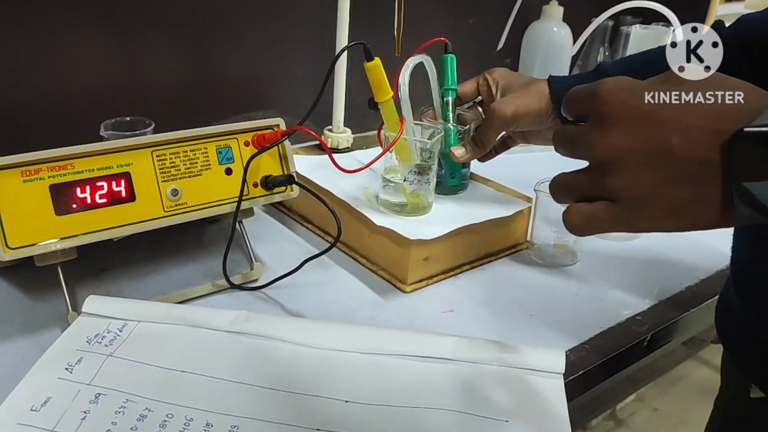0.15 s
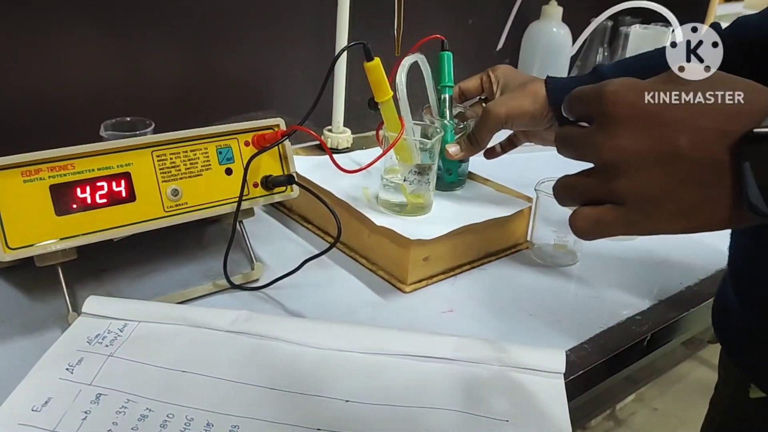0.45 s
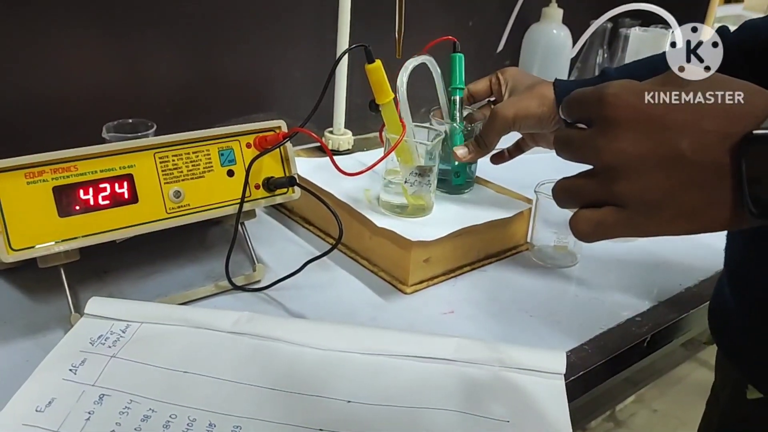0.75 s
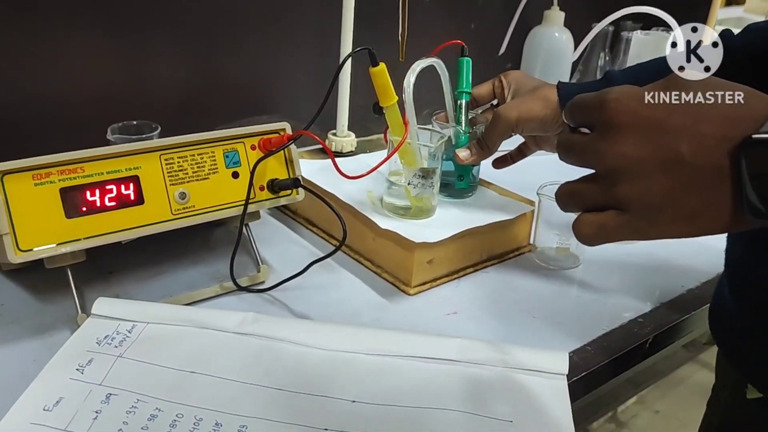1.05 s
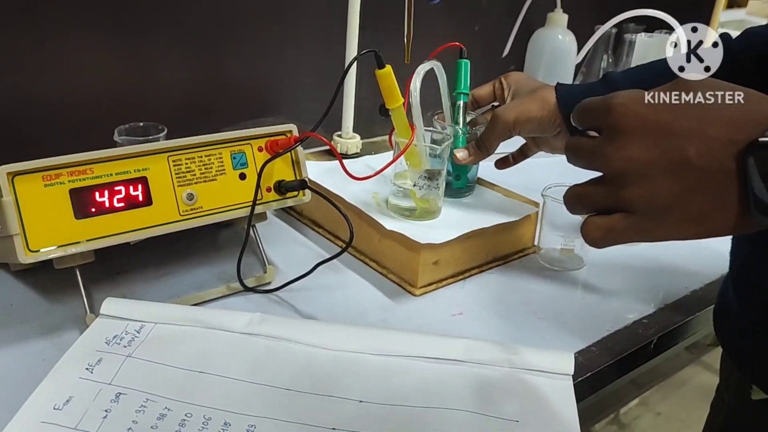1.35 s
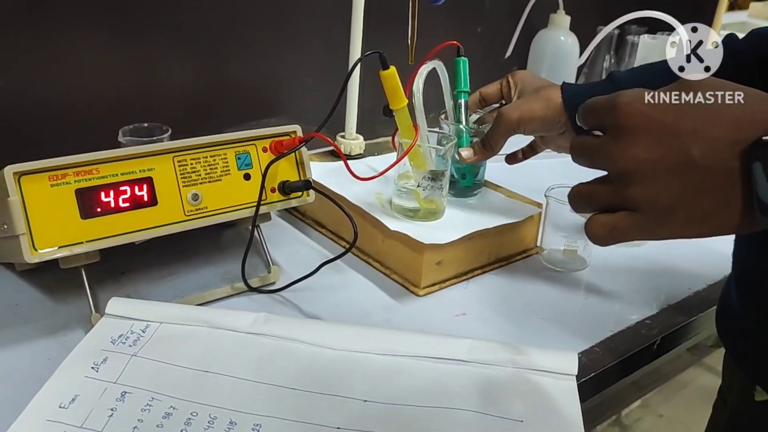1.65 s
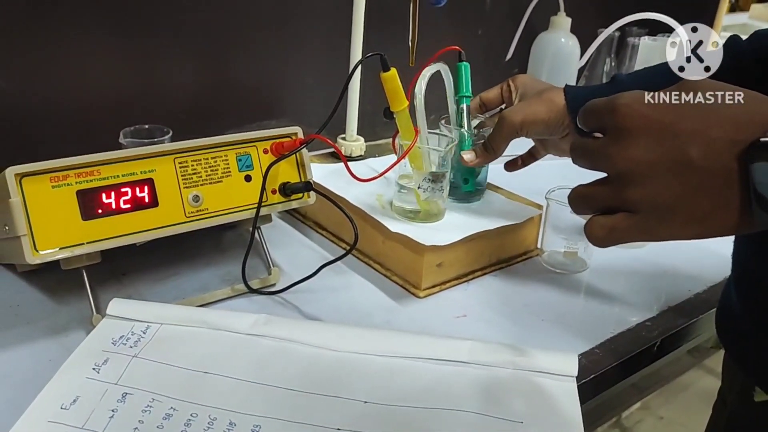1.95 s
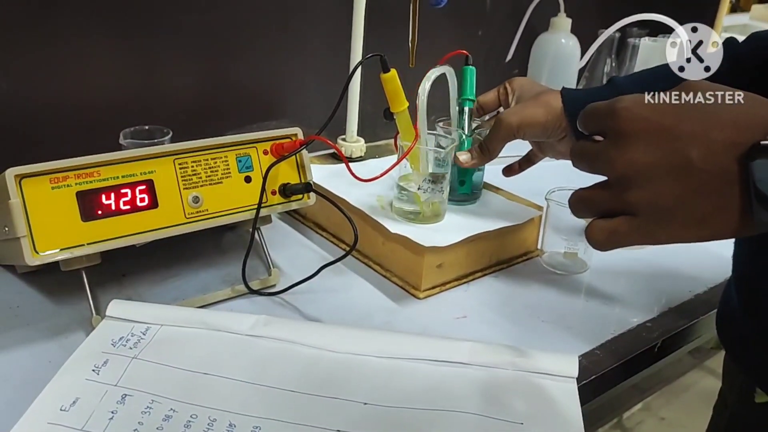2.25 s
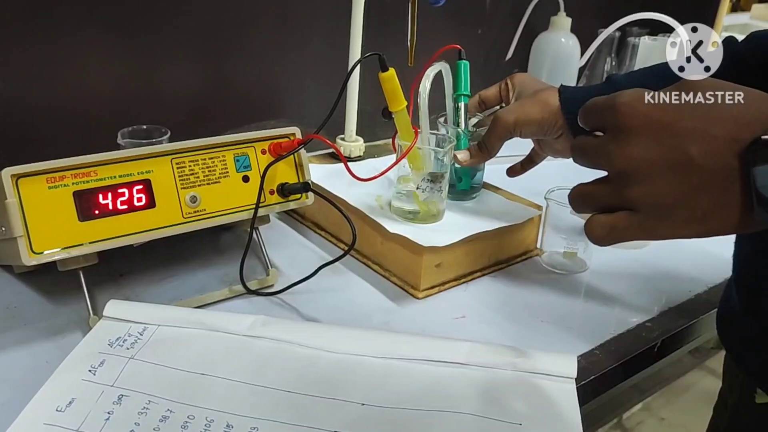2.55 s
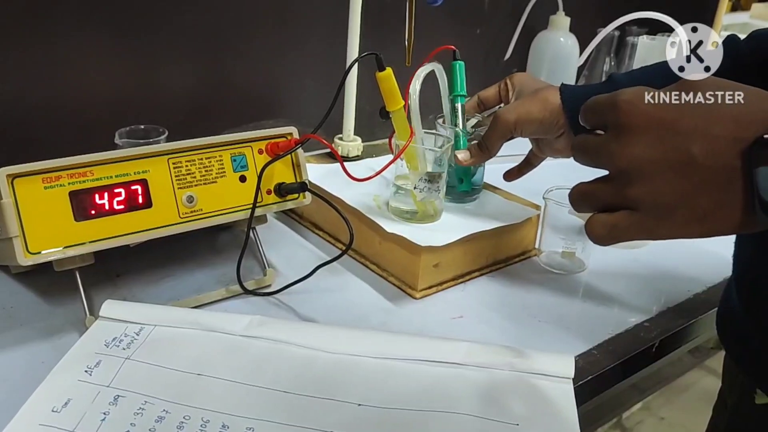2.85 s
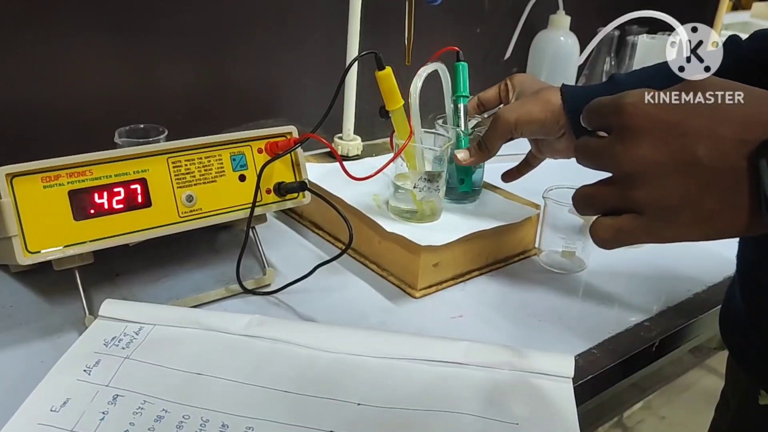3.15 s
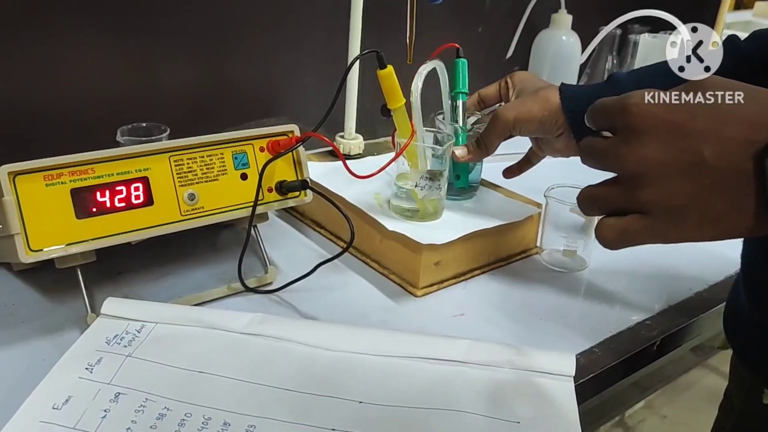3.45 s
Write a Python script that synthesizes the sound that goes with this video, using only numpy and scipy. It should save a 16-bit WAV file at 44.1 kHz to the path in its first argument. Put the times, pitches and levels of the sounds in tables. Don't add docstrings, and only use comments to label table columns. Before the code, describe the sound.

Light, quick glass clinking as a hand swirls a beaker on a wooden stand in a lab

```python
import sys
import numpy as np
from scipy import signal
from scipy.fft import rfft, irfft
from scipy.io import wavfile
from scipy.ndimage import uniform_filter1d

SR = 44100
rng = np.random.default_rng(int(sys.argv[2]) if len(sys.argv) > 2 else 0)


def unload_audio(sound):
    columns = np.transpose(np.atleast_2d(sound))
    steps = np.round(np.clip(columns, -1, 1) * 32767)
    wavfile.write(sys.argv[1], SR, steps.astype(np.int16))


def gain_from_db(level_db):
    decades = np.asarray(level_db, float) / 20
    return 10 ** decades


N = 158760

# (frequency [Hz], level [dB])
AIR = [(40, -4), (120, 3), (350, 2.5), (700, -10), (1700, -13), (3000, -13), (5000, -16), (16000, -18)]
# (frequency [Hz], time to fall 60 dB [s])
ROOM_T60 = [(200, 0.84), (1500, 1), (5000, 0.47), (10000, 0.67), (15000, 0.28)]
# (time
# [s], peak level [dB], pitch [Hz])
TOCKS = [(0.168, -39, 1790), (0.2593, -35, 1960), (0.6015, -42.5, 1990), (0.6429, -38.5, 1900),
         (0.815, -53, 1970), (1.203, -32, 1860), (1.6577, -41.5, 1840), (1.8532, -37, 1810),
         (1.8985, -36.5, 1730), (2.0753, -34, 1830), (2.116, -40, 2070), (2.3041, -34, 1770),
         (2.371, -37, 1590), (2.7444, -41, 1937), (2.81, -41.5, 1900), (2.9745, -36, 1840),
         (3.2048, -34, 1800), (3.2483, -36, 1930), (3.2999, -43, 1880), (3.4232, -37, 1980),
         (2.569, -30, 3380), (2.583, -33, 3550)]
# (time [s], peak level [dB], pitch [Hz], clack level [dB], clack pitch [Hz])
KNOCKS = [(0.002, -51.5, 288, -10, 4170), (0.1335, -42.5, 344, 18.5, 4040), (0.167, -52, 430, 16, 4600),
          (0.279, -37.5, 173, -13, 4040), (0.262, -47.5, 254.4, 2, 4000), (0.346, -44.5, 278, 9, 4230),
          (0.582, -40.5, 345, 22.5, 4190), (0.603, -47, 393, -24, 4140), (0.822, -44, 273, 21.5, 4290),
          (0.831, -43.5, 302, 11, 3870), (1.047, -42.5, 352, 14.5, 4080), (1.262, -41, 315, 19.5, 4280),
          (1.461, -42, 336, 10.5, 4500), (1.707, -39, 327, 13, 4250), (1.861, -40.5, 341, -2, 4170),
          (1.944, -35.5, 328, -22, 4260), (1.992, -45, 293, 11, 3830), (2.086, -42.5, 317, 17, 3540),
          (2.167, -38.5, 274, 14.5, 4120), (2.801, -41.5, 367, 17, 3820), (3.04, -41, 352, 16, 4100),
          (3.472, -44.5, 288, 18.5, 4300), (2.575, -46.5, 137, 3, 3280)]
# (frequency [Hz], level [dB])
STAND_MODES = [(140, -1), (200, -33), (280, 1), (440, -2.5), (1320, 0), (1950, -18.5)]
# (frequency [Hz], level [dB])
RATTLE = [(100, -31), (300, 6.5), (650, -15), (1100, -18), (1300, -6.5), (2000, -5.5), (3000, -18),
          (7000, -24)]
# (frequency [Hz], level [dB])
THUD = [(150, -18), (320, -19), (800, -0.5), (1500, -23), (3000, -16.5), (4200, 3), (8000, -7),
        (14000, -13)]
# (time [s], peak level [dB], main pitch [Hz], tube ring [dB], brightness [dB])
FAR_TICKS = [(0.0285, -26.5, 5320, -19, -0.5), (0.2419, -16, 5010, -42, 0.5), (0.259, -17, 4650, -29, 1),
             (0.268, -23.5, 4670, -29, 8), (0.281, -47, 4700, -29, -5), (0.474, -18.5, 5260, -42, -0.5),
             (0.7107, -16.5, 5310, -16, 4), (0.9276, -22, 5280, -16, -1), (1.1922, -16, 5140, -35, 4),
             (1.3994, -20.5, 5300, -30, 7), (1.6543, -15.5, 5080, -10, 6.5), (1.8854, -15, 5140, -8, 7.5),
             (2.0842, -19, 4720, 3.5, 5.5), (2.1079, -14, 5080, -28, 3.5), (2.114, -13.5, 4760, -19, -1),
             (2.3221, -23, 5500, -22, 11), (2.3303, -10.5, 4725, 0, 1), (2.5674, -20, 4970, -1.5, 6),
             (2.574, -28, 4760, 0, 12), (2.7903, -21, 5090, -23, 7), (2.8094, -22, 5280, -5, -4),
             (3.029, -16, 5045, -24, 0), (3.046, -21.5, 4920, -7.5, 1.5), (3.211, -21, 4470, -7, 4.5),
             (3.243, -20, 5210, -12, 1.5), (3.464, -22.5, 5330, -20, -0.5), (3.4747, -27.5, 5000, -7, 1)]
# (time [s], peak level [dB], main pitch [Hz], tube ring [dB], brightness [dB])
NEAR_TICKS = [(0.1421, -30, 4830, -30, 3.5), (0.1685, -31, 4950, -30, -4), (0.3446, -38, 4690, -30, 2),
              (0.587, -27, 4870, -34, -4), (0.8295, -28.5, 4900, -30, 3), (1.4611, -30.5, 5000, -6, -1.5),
              (0.3877, -15.5, 4720, -37, -7.5), (0.632, -17.5, 5010, -42, -6),
              (0.856, -16.5, 4790, -43, -4), (1.0657, -32, 5020, -32, -32), (1.1363, -27, 4960, -36, -1.5),
              (1.3781, -17, 4870, -23, -7), (1.6141, -14, 4980, -43, -7), (1.706, -22.5, 4600, 3, -6),
              (1.842, -7.5, 4860, -44, -5.5), (1.943, -29, 4860, 3.5, 10), (1.994, -25, 4780, -35, -19),
              (2.0627, -13, 4890, -32, 3), (2.165, -45, 4800, -27, -7), (2.2938, -12, 4870, -33, -3),
              (2.7324, -11, 4850, -14.5, -6), (2.9632, -12, 4794, -15, -1), (3.194, -15.5, 4830, -14, 1.5),
              (3.4109, -15.5, 4867, -5, 1.5)]
# (frequency [Hz], level [dB])
FAR_MODES = [(1537, -39), (3820, -17.5), (4650, -18.5), (7090, -20), (7960, -18), (8543, -12),
             (8846, -13.5), (9870, -23), (11040, -12), (13730, -13), (13200, -32), (15100, -37.5)]
# (frequency [Hz], level [dB])
NEAR_MODES = [(1900, -33), (4180, -39), (4680, -18.5), (7900, -21), (8700, -11), (9190, -9.5),
              (11400, -14.5), (13600, -12.5)]
# (frequency [Hz], level [dB])
CRACK = [(900, -18.5), (1500, -8.5), (2900, -16), (5000, 4), (6500, -5), (8700, -5.5), (10400, -3.5),
         (14000, -5)]
# (frequency [Hz], left minus right [dB])
PORTS = [(60, -7), (110, 5), (200, -1), (380, 0), (700, -1.5), (1290, 2.5), (2380, 1.5), (4400, -9.5),
         (8120, -2), (15000, -7)]
# (frequency [Hz], level [dB])
MIC = [(9300, 2), (10400, -6.5), (11150, -2), (12300, -7), (13800, -2), (14700, -3.5)]
# (frequency [Hz], level [dB])
BODY = [(2100, 0.5), (2700, 2), (3200, 1.5), (3800, 3), (4400, -2.5), (4900, 1.5), (5500, -4.5), (6500, 0)]
# (low edge [Hz], margin [dB])
MUTED = [(9600, -13), (10300, -13), (11700, -22), (12400, -24), (14400, -20), (15100, -22), (15800, -30)]

AIR_DB, FLICKER_DB, FLICKER_HZ = -55, 3, 9.8
ALIKE_HZ = 580
ECHO_DELAY_S, ECHO_DB, ECHO_T60_S, ECHO_RISE_S = 0.008, -7.5, 0.084, 0.00087
ROOM_DB, ROOM_RISE_S, SHIMMER_DB = -8.5, 0.012, 3
SCATTER_DB, DETUNE, MAIN_WANDER = 3, 0.017, 0.08
TURN_RAD, TURN_HZ = 0.8, 900
BOUNCE_S, BOUNCE_SPREAD = 0.0135, 0.15
KNOCK_BOUNCE_DB, FAR_BOUNCE_DB, NEAR_BOUNCE_DB = -10.5, -6, -12
SPLIT = 3
GLASS_T60_S, WOOD_T60_S = 0.021, 0.045
TOCK_DB, TOCK_T60_S = 2, 0.026
STAND_T60_S, STAND_RISE_S, CLACK_T60_S = 0.16, 0.0029, 0.023
RATTLE_DB, RATTLE_T60_S = 0.5, 0.17
THUD_DB, THUD_T60_S, TAP_DB = 6, 0.024, -6
FAR_PAN_DB, FAR_T60_S, FAR_RISE_S = -1, 0.024, 0.0013
NEAR_PAN_DB, NEAR_T60_S, NEAR_RISE_S = -3, 0.028, 0.003
TUBE_HZ, TUBE_DB, TUBE_T60_S = 5930, -9, 0.05
TWIN_DB, TWIN_RATIO = -5, 1.035
CRACK_DB, CRACK_T60_S = -5.5, 0.028
GRIP_S, GRIP_DB = 1.3, -8.5
TOP_HZ, TOP_DB = 15500, -29
MUTE_WIDTH_HZ, WAVER_DB = 700, 4


def curve(table, hz):
    p = np.array(table, float)
    return np.interp(np.log(np.maximum(hz, 1)), np.log(p[:, 0]), p[:, 1])


def colour(x, db):
    n = x.shape[-1]
    hz = np.arange(n // 2 + 1) * SR / n
    return irfft(rfft(x) * gain_from_db(db(hz)), n)


def fade(t, t60, rise=1e-4):
    return (1 - np.exp(-t / abs(rise))) * np.exp(-np.log(1000) * t / np.abs(t60))


def alike(mid, pair):
    def shared(f):
        return 1 / (1 + (f / ALIKE_HZ) ** 4) / (1 + (45 / (f + 1)) ** 4)

    same = colour(mid, lambda f: 10 * np.log10(shared(f)))
    return same + colour(pair, lambda f: 10 * np.log10(1.03 - shared(f)))


def noise(n):
    return alike(rng.standard_normal(n), rng.standard_normal((2, n)))


def air():
    x = colour(noise(N), lambda f: curve(AIR, f))
    low = colour(x, lambda f: -10 * np.log10(1 + (f / ALIKE_HZ) ** 4))
    walk = colour(rng.standard_normal((2, N)), lambda f: -10 * np.log10(1 + (f / FLICKER_HZ) ** 4))
    gain = gain_from_db(FLICKER_DB * walk / walk.std())
    return (low * gain[0] + (x - low) * gain[1]) / x.std() * gain_from_db(AIR_DB)


def room(x):
    def unit(h):
        return h / np.sqrt((h ** 2).sum(axis=-1).mean())

    t = np.arange(SR) / SR
    echo = noise(SR) * fade(np.maximum(t - ECHO_DELAY_S, 0), ECHO_T60_S, ECHO_RISE_S)
    tail, source = 0, noise(SR)
    for hz in 125 * 2. ** np.arange(8):
        def octave(f):
            distance = np.clip(np.log2((f + 1) / hz), -1, 1)
            return 20 * np.log10(np.cos(distance * np.pi / 2) ** 2 + 1e-6)

        tail = tail + colour(source, octave) * fade(t, curve(ROOM_T60, hz), ROOM_RISE_S)
    reply = gain_from_db(ECHO_DB) * unit(echo) + gain_from_db(ROOM_DB) * unit(tail)
    return signal.fftconvolve(x.mean(axis=0)[None], reply, axes=1)[:, :N]


def shimmer(x):
    _, _, z = signal.stft(x, SR, nperseg=512)
    waver = uniform_filter1d(rng.standard_normal(z.shape[1:]), size=4, axis=0)
    waver = uniform_filter1d(waver, size=4, axis=1)
    gain = gain_from_db(SHIMMER_DB * waver / waver.std() - 2)
    return signal.istft(z * gain, SR, nperseg=512)[1][:, :N]


def ring(events, modes, rise, hiss, hiss_db, hiss_t60, pan_db):
    out = np.zeros((2, N + SR))
    t = np.arange(SR // 7 if hiss_t60 > .1 else SR // 14) / SR
    for (start, db), rows, level_db in zip(events, modes, hiss_db):
        hz, mode_db, t60 = np.array(rows, float).T[:, :, None]
        detune, shift, scatter, turn = rng.standard_normal((4, len(rows), 1))
        free = np.arange(len(rows))[:, None] > 1
        pitch = hz * (1 + DETUNE * detune * np.maximum(free, MAIN_WANDER))
        phase = 2 * np.pi * pitch * t + 3 * shift
        env = gain_from_db(mode_db + SCATTER_DB * scatter * free) * fade(t, t60, rise)
        crack = colour(noise(len(t)), lambda f: curve(hiss, f))
        crack = crack / crack.std() * gain_from_db(level_db) * fade(t, hiss_t60, rise / 2)
        turn = TURN_RAD * np.minimum(hz / TURN_HZ, 1) * turn
        i = int(start * SR)
        for c, side in enumerate((1, -1)):
            tone = (env * np.sin(phase + side * turn)).sum(axis=0)
            out[c, i:i + len(t)] += gain_from_db(db + side * pan_db / 2) * (tone + crack[c])
    return out[:, :N]


def bounced(table, loss_db):
    rebounds = []
    for time, db, *rest in table:
        for k, r in enumerate(rng.standard_normal(2)):
            delay = BOUNCE_S * (k + 1 - k / 4) * (1 + BOUNCE_SPREAD * r)
            rebounds.append((time + delay, db + loss_db * (1.7 * k + 1), *rest))
    return list(table) + rebounds


def tocks():
    rows = [SPLIT * [(hz, TOCK_DB - 3, TOCK_T60_S), (1.05 * hz, TOCK_DB - 6, TOCK_T60_S)]
            for _, _, hz in TOCKS]
    hits = [e[:2] for e in TOCKS]
    return ring(hits, rows, NEAR_RISE_S, CRACK, [TOCK_DB - 13] * len(hits), TOCK_T60_S, 0)


def knocks():
    hits = [e[:2] for e in KNOCKS]
    taps = bounced(KNOCKS, KNOCK_BOUNCE_DB)
    stand = [(f, g, WOOD_T60_S) for f, g in STAND_MODES]
    wood = [[(e[2], -6, STAND_T60_S)] + stand for e in KNOCKS]
    rattle = ring(hits, wood, STAND_RISE_S, RATTLE, [RATTLE_DB] * len(hits), RATTLE_T60_S, 0)
    clack = [SPLIT * [(hz, db - 11, CLACK_T60_S)] + [(0.95 * hz, db - 12, CLACK_T60_S)]
             for _, _, _, db, hz in taps]
    thud_db = [THUD_DB + e[3] / 2 + TAP_DB for e in taps]
    return rattle + ring([e[:2] for e in taps], clack, FAR_RISE_S, THUD, thud_db, THUD_T60_S, 0)


def ticks(table, modes, pan_db, t60, rise):
    rows = []
    for time, _, hz, tube, bright in table:
        tones = [(hz, -4, t60),
                 (TUBE_HZ, tube + TUBE_DB, TUBE_T60_S),
                 (hz * TWIN_RATIO, TWIN_DB - 0.5, t60 / 2),
                 (hz / TWIN_RATIO, TWIN_DB + 1.5, t60 / 2),
                 (TUBE_HZ, tube + TUBE_DB + 16, GLASS_T60_S)]
        side = []
        for f, g in modes:
            damping = GRIP_DB * (3000 < f < 4000 and time > GRIP_S)
            side.append((f, g + bright * (f > 6500) + damping, GLASS_T60_S if f > 3000 else WOOD_T60_S))
        rows.append(tones + SPLIT * side)
    crack_db = [CRACK_DB + e[4] / 2 for e in table]
    return ring([e[:2] for e in table], rows, rise, CRACK, crack_db, CRACK_T60_S, pan_db)


def scene():
    near = ticks(bounced(NEAR_TICKS, NEAR_BOUNCE_DB), NEAR_MODES, NEAR_PAN_DB, NEAR_T60_S, NEAR_RISE_S)
    far = ticks(bounced(FAR_TICKS, FAR_BOUNCE_DB), FAR_MODES, FAR_PAN_DB, FAR_T60_S, FAR_RISE_S)
    direct = near + far + knocks() + tocks()
    return direct + shimmer(room(direct)) + air()


def mute(x):
    f, _, z = signal.stft(x, SR, nperseg=1024)

    def power(lo, hi):
        return (np.abs(z[:, (f >= lo) & (f < hi)]) ** 2).mean(axis=(0, 1))

    glass = power(4400, 5400)
    attack = glass > 2 * np.roll(glass, 2)
    for lo, margin_db in MUTED:
        hi = lo + MUTE_WIDTH_HZ
        waver = uniform_filter1d(WAVER_DB * rng.standard_normal(len(glass)), size=9)
        loud = power(lo, hi) > glass * gain_from_db(2 * (margin_db + waver))
        z[:, (f >= lo) & (f < hi)] *= attack | loud
    return signal.istft(z, SR, nperseg=1024)[1][:, :N]


def roll_off(x):
    return signal.sosfilt(signal.butter(12, 16490, fs=SR, output="sos"), x)


def record(dry):
    def port(f, side):
        return side * curve(PORTS, f) / 2 + curve(MIC, f) + curve(BODY, f) + TOP_DB * (f > TOP_HZ)

    left = colour(dry[0], lambda f: port(f, 1))
    right = colour(dry[1], lambda f: port(f, -1))
    return roll_off(mute(np.array([left, right])))


dry = scene()
out = record(dry)
unload_audio(out)
```